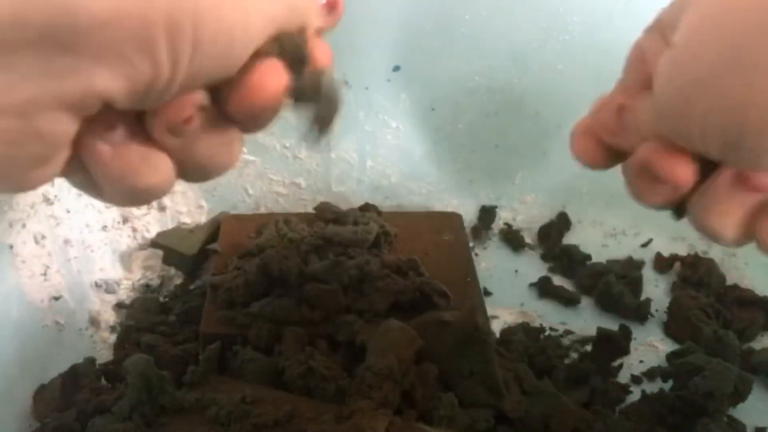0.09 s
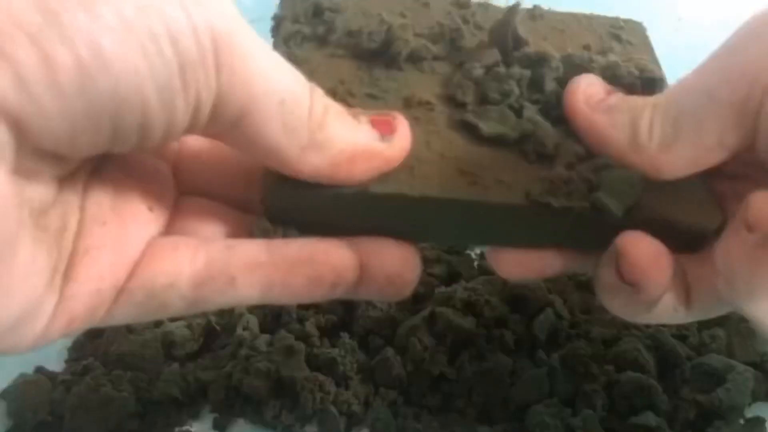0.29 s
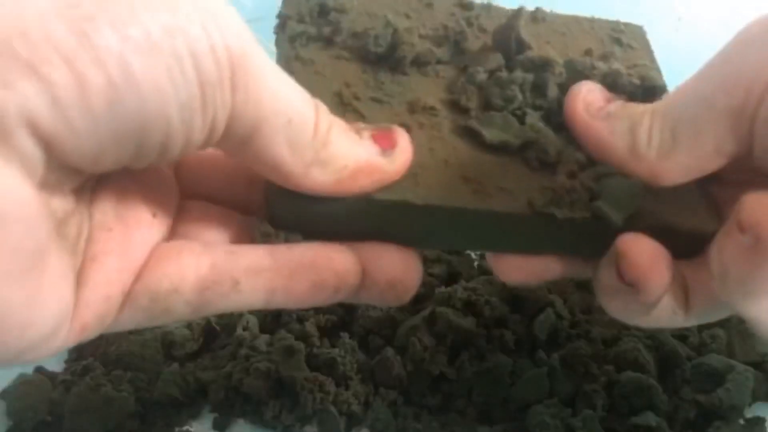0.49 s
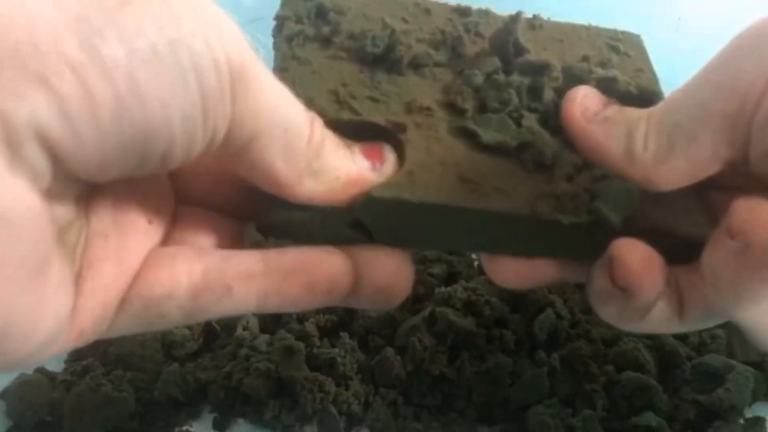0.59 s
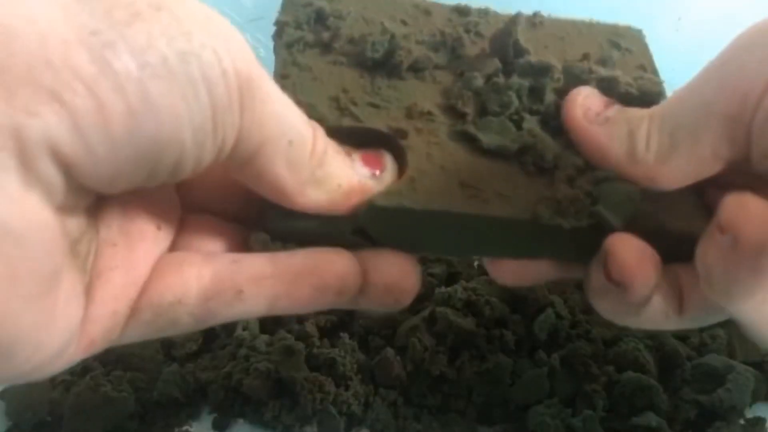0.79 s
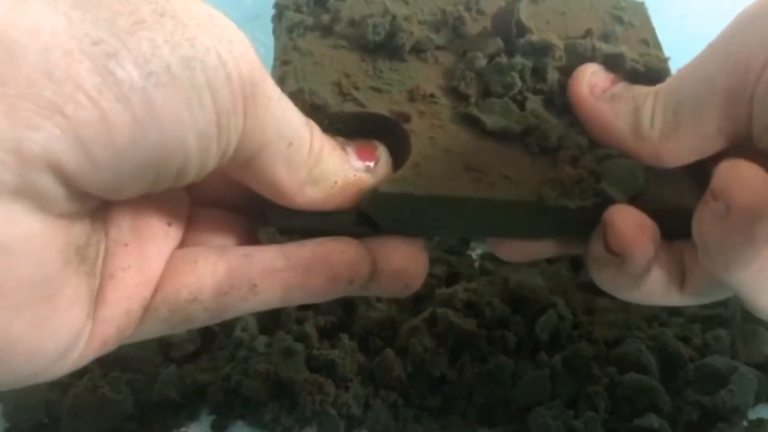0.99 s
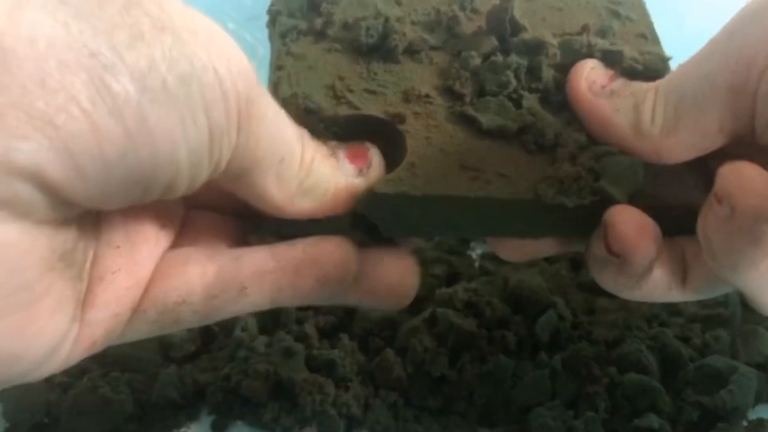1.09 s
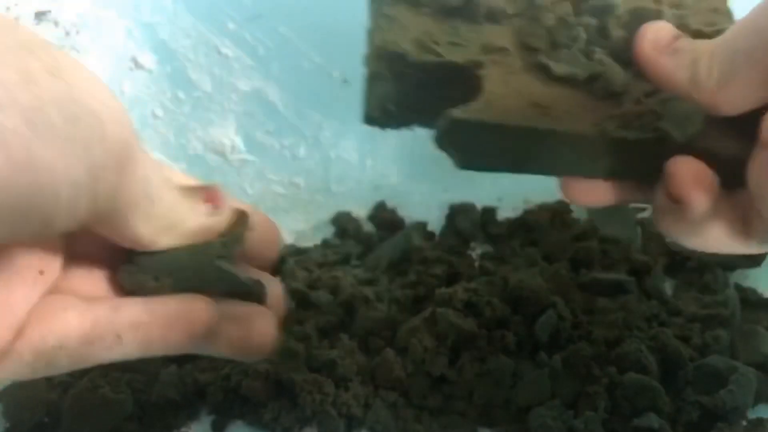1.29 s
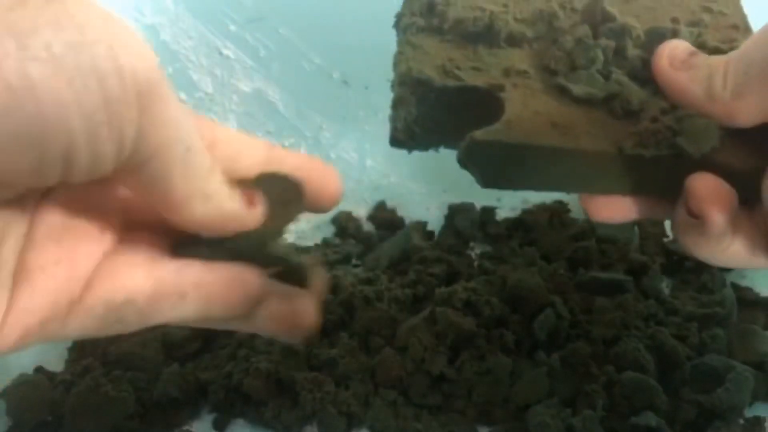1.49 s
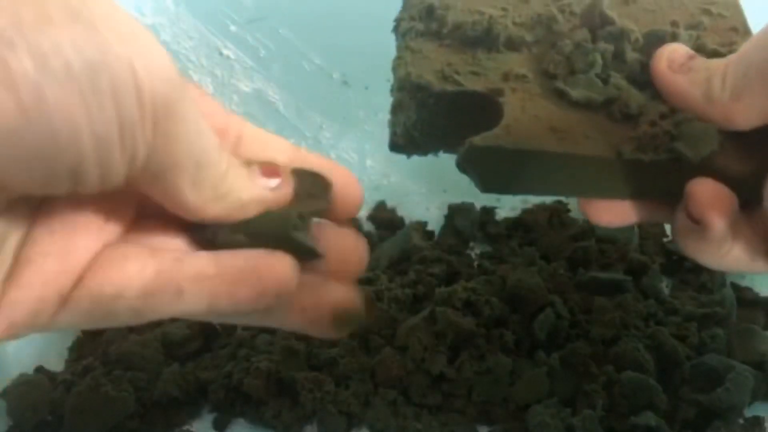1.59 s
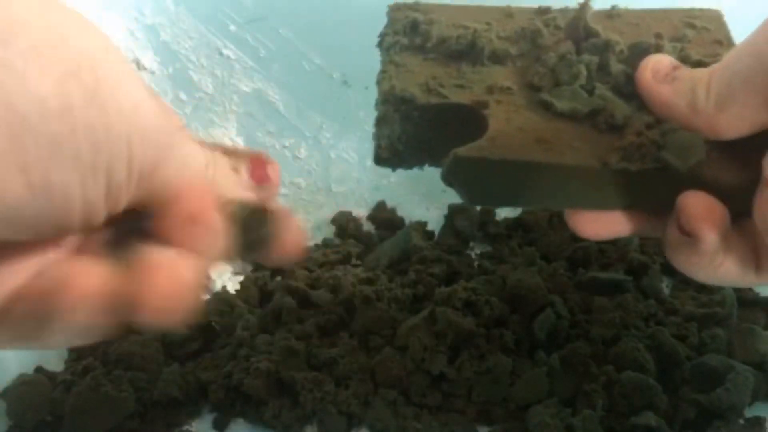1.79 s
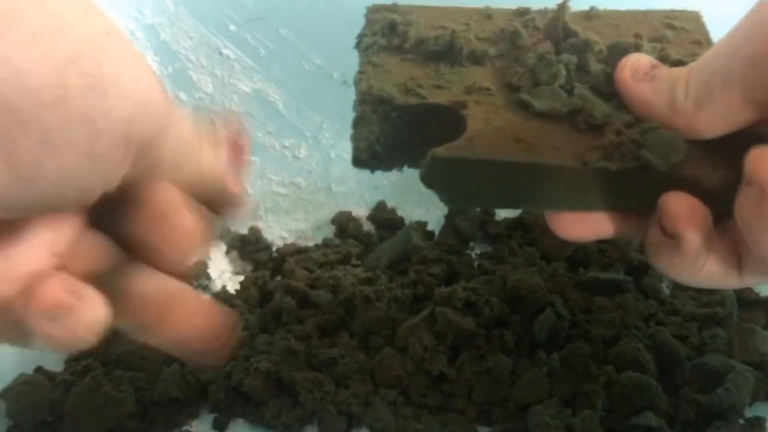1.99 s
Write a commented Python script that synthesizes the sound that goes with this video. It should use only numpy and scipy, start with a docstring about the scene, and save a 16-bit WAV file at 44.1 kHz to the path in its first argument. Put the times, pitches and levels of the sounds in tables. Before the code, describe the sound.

Crisp crunching of dry foam crushed by hand, then raspy dusty scraping with a few sharp ticks

```python
"""Hands crumble dry floral foam close to the microphone, in a quiet room.
A lump collapses in a quick run of crunches: clouds of tiny fractures that ring, knock and thud in the foam.
Single brittle snaps, short filtered noise bursts, crack beside the crunches and after them.
Fingers rub the foam before, between and after: streams of fine grains give a gritty hiss and rasp.
Faint reflections from hands and tray, and soft air noise, lie behind; a brief silence precedes the crunches."""
import sys
import numpy as np
from scipy import signal
from scipy.io import wavfile
from scipy.ndimage import uniform_filter1d

SR = 44100
rng = np.random.default_rng(int(sys.argv[2]) if len(sys.argv) > 2 else 0)


def unload_wav(signal):
    """Save mono or channel-first audio to the path in sys.argv[1] as 16-bit WAV at rate SR, clipped to [-1, 1]."""
    wavfile.write(
        sys.argv[1],
        SR,
        np.round(np.clip(np.atleast_2d(signal).T, -1, 1) * 32767).astype(np.int16),
    )


N = 88200  # samples, two seconds
TIME = np.arange(N) / SR  # s
BINS = np.fft.rfftfreq(4096, 1 / SR)  # Hz


def amp(db):
    """Decibels to gain."""
    return 10 ** (np.asarray(db) / 20)


def evened(x):
    """Scales to an rms of one."""
    return x / np.sqrt(np.mean(x ** 2) + 1e-20)


def random_signs():
    """White noise of random +1 and -1 samples."""
    return rng.choice([-1, 1], N)


def colour(points):
    """Gain at each frequency, drawn through a few (Hz, dB) points on a log frequency axis."""
    hz, db = np.transpose(points)
    return amp(np.interp(np.log(BINS + 1), np.log(hz), db))


def shaped(x, gain):
    """Minimum-phase filter with the given gains, scaled to unit energy so only their relation counts."""
    both_sides = np.r_[gain, gain[-2:0:-1]]
    log_gain = np.log(np.maximum(both_sides, 1e-5))
    spectrum = np.exp(np.conj(signal.hilbert(log_gain)))
    taps = np.fft.ifft(spectrum).real[:len(BINS)]
    return signal.oaconvolve(x, taps / np.linalg.norm(taps))[:N]


def hollow(modes):
    """Gain of a piece of foam's resonances, whose powers add."""
    power = 0
    for hz, half_width, db in modes:
        power = power + amp(db) ** 2 / (1 + ((BINS - hz) / half_width) ** 2) ** 2
    return np.sqrt(power)


def grains(per_s, spread_db):
    """Tiny fractures at random moments, most small, a few large."""
    size = amp(spread_db * np.minimum(rng.exponential(1, N), 5))
    present = rng.random(N) < per_s / SR
    return evened(size * random_signs() * present)


def judder(depth_db, hz):
    """Uneven stick and slip: a gain gliding between random values, hz of them a second."""
    count = int(N / SR * hz) + 2
    values = rng.standard_normal(count)
    return amp(depth_db * np.interp(TIME * hz, np.arange(count), values))


def swells(rows, shape, lag=0):
    """One envelope per level column: each event swells to its peak and dies away (1 pointed, 2 rounded)."""
    power = 0
    for peak, rise, fall, *levels in rows:
        t = TIME - peak - lag
        away = abs(np.where(t < 0, t / rise, t / fall))  # at 1 the level is about 6 dB down
        power = power + np.outer(amp(levels) ** 2, np.exp(-np.sqrt(2) * away ** shape))
    return np.sqrt(power)


# Colour of the quiet room's air. Each row: frequency in Hz, relative level in dB.
AIR_COLOUR = [(20, -20.5), (90, 0.5), (200, -3.5), (600, -9), (2000, -17), (5000, -17.5), (16000, -13)]


def room_air():
    """Steady random noise, coloured as the faint air of a quiet room."""
    level_db = -64.5
    return amp(level_db) * shaped(rng.standard_normal(N), colour(AIR_COLOUR))


def nearby_reflections(x):
    """Faint, very short reflections from the hands and the tray: sparse, fading random echoes."""
    level_db, decay_s, density = -20.5, 0.0062, .1
    t = TIME[:len(BINS)]
    present = rng.random(len(t)) < density
    taps = rng.standard_normal(len(t)) * present * np.exp(-t / decay_s)
    return amp(level_db) * signal.oaconvolve(x, taps / np.linalg.norm(taps))[:N]


# Strokes of skin on foam, close to the microphone. Each row: peak in seconds, rise in seconds,
# fall in seconds, rasp pitch in Hz, then levels in dB of rasp, fine hiss, hollow ring and low scuff.
STROKES = [(0.013, 0.085, 0.038, 4270, -47.5, -43, -60.5, -66),
           (.078, 0.03, 0.025, 3500, -74, -45.5, -57.5, -68),
           (.145, 0.056, .03, 4200, -54.5, -55, -65, -83),
           (.50, .02, 0.057, 3050, -50.5, -44.5, -59, -64.5),
           (.70, 0.046, 0.14, 5050, -74, -52.5, -73, -91), (.82, 0.062, 0.1, 4340, -52, -45.5, -63, -70.5),
           (0.904, 0.013, 0.015, 3680, -50.5, -38.5, -53, -67),
           (.945, 0.039, 0.025, 3300, -58.5, -47, -57, -64),
           (1.045, 0.045, 0.029, 4930, -49, -40, -51, -64),
           (1.061, 0.011, .014, 4800, -37, -34.5, -40.5, -51),
           (1.086, .004, 0.035, 4940, -41, -38.5, -62, -57),
           (1.26, 0.053, 0.048, 4830, -39, -39.5, -56.5, -62),
           (1.49, 0.043, 0.026, 4460, -48.5, -52, -63.5, -72.5),
           (1.58, 0.047, 0.045, 6500, -41, -39, -67.5, -75.5),
           (1.675, 0.03, 0.021, 4480, -50, -32.5, -60, -65.5),
           (1.717, 0.02, 0.022, 4320, -38, -33.5, -61, -67.5),
           (1.808, 0.058, 0.077, 3660, -47, -47, -65, -70.5),
           (1.836, 0.014, 0.025, 2240, -51.5, -64, -80, -85),
           (1.944, 0.024, 0.01, 3020, -53, -46, -56, -67),
           (2.0, 0.039, 0.027, 4600, -58, -55.5, -69.5, -65.5)]
# Colour of the fine dust hiss. Each row: frequency in Hz, relative level in dB.
HISS_COLOUR = [(100, -53), (2000, -14), (4000, -8.5), (6000, -1.5), (9000, 0), (13000, 1.5), (16000, -2.5)]
# Resonances of the rubbed block. Each row: frequency in Hz, half-width in Hz, relative level in dB.
BLOCK_MODES = [(404, 128, -12), (791, 77, 2.5), (1063, 87, -0.5), (1343, 84, -7), (1510, 230, -0.5),
               (1855, 77, -13.5), (2390, 340, -11)]
# Colour of skin dragging low on the block. Each row: frequency in Hz, relative level in dB.
SCUFF_COLOUR = [(20, -36), (60, -9), (140, -2), (250, -1), (400, -2.5), (600, -4), (1100, -14), (4000, -45)]


def rubbing():
    """Fingers scrape off dust: dense fine grains and some coarse grit, with a rasp pitched by the grip."""
    stroke_shape = 1.68
    grains_per_s, spread_db = 22000, 2.5
    grit_per_s, grit_db, grit_spread_db = 400, -16, 3
    rasp_q, rasp_high_pass_hz = 1.64, 1490

    slip = judder(depth_db=1.64, hz=181.8)
    grit = amp(grit_db) * grains(grit_per_s, grit_spread_db)

    def scraped():
        """Fresh fine grains under the shared grit and slip."""
        return slip * (grains(grains_per_s, spread_db) + grit)

    layer_rows = [(peak, rise, fall, *dbs) for peak, rise, fall, _, _, *dbs in STROKES]
    levels = swells(layer_rows, stroke_shape)
    gains = colour(HISS_COLOUR), hollow(BLOCK_MODES), colour(SCUFF_COLOUR)
    out = np.zeros(N)
    for level, gain in zip(levels, gains):
        out += shaped(level * scraped(), gain)

    rasp = scraped()
    f = BINS + 1  # avoids dividing by zero
    high_pass = 1 / np.hypot(1, (rasp_high_pass_hz / f) ** 2)
    for peak, rise, fall, hz, db, *_ in STROKES:
        resonance = 1 / np.hypot(1, rasp_q * (f / hz - hz / f))
        level = swells([(peak, rise, fall, db)], stroke_shape)[0]
        out += shaped(level * rasp, resonance * high_pass)
    return out


# Single brittle snaps close to the microphone. Each row: start in seconds, level in dB,
# lower edge in Hz, upper edge in Hz, decay in seconds, knock level in dB.
SNAPS = [(0.319, -8.5, 1190, 13300, 0.00083, -32.5), (.4777, -17.5, 3500, 14000, 0.00053, -59),
         (0.6564, -37, 6660, 14000, 0.0023, -68), (0.8059, -31.5, 6960, 14000, 0.0021, -69),
         (0.8909, -30, 1500, 11000, 0.0019, -39), (.939, -40, 900, 5000, 0.0011, -48),
         (1.0839, -16.5, 2580, 7900, 0.00099, -44), (1.5449, -21, 5400, 11000, 0.00035, -70),
         (1.6369, -25.5, 2200, 7100, 0.00083, -58), (1.667, -23.5, 3960, 12000, 0.00066, -65),
         (1.742, -11.5, 3080, 5950, 0.00028, -55), (1.745, -23.5, 3000, 5960, 0.00039, -64),
         (1.76, -15.5, 2900, 5800, 0.00023, -61), (1.7617, -19.5, 2850, 5960, 0.00037, -57),
         (1.835, -34, 1600, 4000, 0.0019, -74)]
# Dull knock of the foam, in snaps and crunches. Each row: frequency in Hz, relative level in dB.
KNOCK_COLOUR = [(60, -29), (150, -16), (250, -7), (380, -0.5), (520, -6), (800, -7), (1400, -37),
                (5000, -52)]


def snaps():
    """Quick cracks of fading band-limited noise, each followed by a dull knock as the piece comes free."""
    knock_s = 0.0018  # from the crack to the peak of the knock's drive
    out, push = np.zeros(N), np.zeros(N)
    for start, db, low_hz, high_hz, decay, knock_db in SNAPS:
        t = np.maximum(TIME - start, 0)
        burst = (t > 0) * random_signs()
        low_cut = 1 + (low_hz / (BINS + 1)) ** 6
        high_cut = 1 + (BINS / high_hz) ** 6
        crack = shaped(burst * np.exp(-t / decay), 1 / np.sqrt(low_cut * high_cut))
        # the energy of the decaying burst, whatever the band
        out += amp(db) * np.sqrt(decay * SR / 2) * crack / np.linalg.norm(crack)
        push += 2 * amp(knock_db) * burst * t / knock_s * np.exp(-t / knock_s)
    return out + shaped(push, colour(KNOCK_COLOUR))


# Crunches of the lump, close to the microphone. Each row: peak in seconds, rise in seconds,
# fall in seconds, then levels in dB of crackle, hollow ring, knock and low thud.
CRUNCHES = [(.2042, 0.00039, 0.006, -27, -33.5, -40, -57), (.219, 0.0039, 0.0062, -31.5, -38.5, -44, -57),
            (.226, 0.0013, 0.0064, -28, -36, -61, -65), (.233, 0.004, 0.0041, -43, -39, -43.5, -55),
            (.2555, 0.0064, 0.0041, -22, -29, -42.5, -50), (.2695, 0.0029, 0.0052, -29.5, -44, -42, -54),
            (.2825, 0.0044, 0.0029, -29.5, -34, -60, -62), (.290, 0.0014, 0.0031, -25, -32.5, -50, -50),
            (.310, 0.0071, 0.012, -38.5, -50, -56, -57), (.340, 0.0047, 0.0049, -30, -39, -50, -52),
            (.3515, 0.0019, 0.0032, -24, -32.5, -36, -45), (.373, 0.0093, .012, -42, -53, -62, -64),
            (.3985, 0.0022, 0.0033, -16, -25.5, -32.5, -36), (.411, 0.0013, 0.0042, -25, -25, -43, -52),
            (.425, .035, 0.013, -38, -46.5, -64, -62), (.444, 0.0026, 0.0047, -14, -22.5, -38.5, -53),
            (.4507, 0.0023, 0.0049, -11.5, -34.5, -38.5, -32.5), (.468, 0.023, 0.013, -32, -37, -43, -52),
            (.484, 0.0044, 0.0067, -29.5, -44, -54, -60)]
# Colour of the breaking cells. Each row: frequency in Hz, relative level in dB.
CRACKLE_COLOUR = [(100, -32), (700, -42), (2000, -7), (3000, -3), (4500, -4), (7000, -1.5), (12000, -2),
                  (16000, -4.5)]
# Resonances of the lump. Each row: frequency in Hz, half-width in Hz, relative level in dB.
LUMP_MODES = [(380, 48, -11.5), (834, 70, -3.5), (1030, 74, -5.5), (1275, 66, -0.5), (1440, 127, 2),
              (1634, 106, -2.5), (1904, 68, -14), (2200, 92, -12.5)]
# Colour of the soft thud of foam giving way. Each row: frequency in Hz, relative level in dB.
THUD_COLOUR = [(20, -44), (50, -15), (90, -3), (140, 0.5), (220, -4.5), (380, -5.5), (550, -9), (1000, -21),
               (4000, -42)]


def crunches():
    """Cells collapse in avalanches; the lump rings, knocks and then gives way with a soft thud."""
    crunch_shape = 1.69
    ring_lag_s, knock_lag_s, thud_lag_s = .0001, 0.0012, 0.0051
    fractures = grains(per_s=20000, spread_db=2.7)
    crackle = swells(CRUNCHES, crunch_shape)[0] * fractures
    out = shaped(crackle * judder(depth_db=4.0, hz=788.7), colour(CRACKLE_COLOUR))
    body = (
        (ring_lag_s, hollow(LUMP_MODES)),
        (knock_lag_s, colour(KNOCK_COLOUR)),
        (thud_lag_s, colour(THUD_COLOUR)),
    )
    for column, (lag, gain) in enumerate(body, 1):
        level = swells(CRUNCHES, crunch_shape, lag)[column]
        out += shaped(level * random_signs(), gain)
    return out


def scene():
    """Foam sounds and their close reflections over the faint noise of a quiet room."""
    foam = rubbing() + snaps() + crunches()
    return (room_air() + nearby_reflections(foam) + foam)[None]


def record(dry):
    """A brief gap of silence before the crunches, soft overload on the loudest peaks, then the band limit."""
    gap_start_s, gap_end_s = .150, .203
    ceiling, edge_hz = .62, 16000
    rounded = dry / (1 + (dry / ceiling) ** 4) ** .25
    outside_gap = (TIME < gap_start_s) | (TIME > gap_end_s)
    sounding = uniform_filter1d(1. * outside_gap, size=30)  # softens the gap's edges
    low_pass = signal.firwin(511, edge_hz, window=("kaiser", 9), fs=SR)
    return signal.oaconvolve(rounded * sounding, low_pass[None], "same")


dry = scene()
out = record(dry)
unload_wav(out)
```